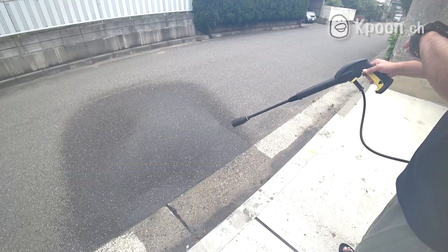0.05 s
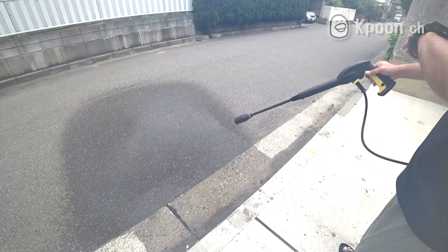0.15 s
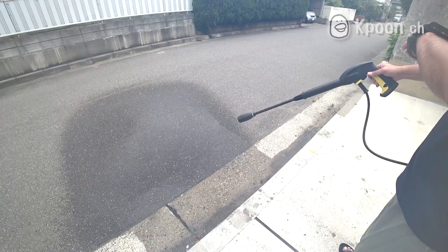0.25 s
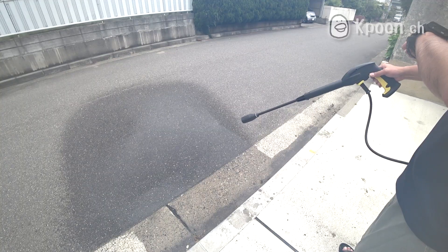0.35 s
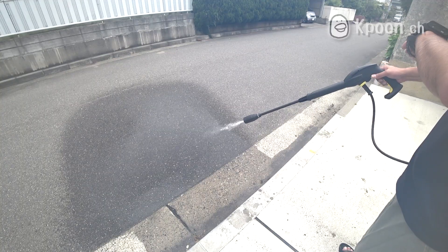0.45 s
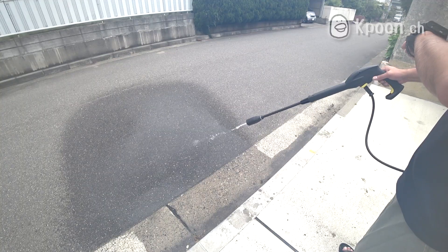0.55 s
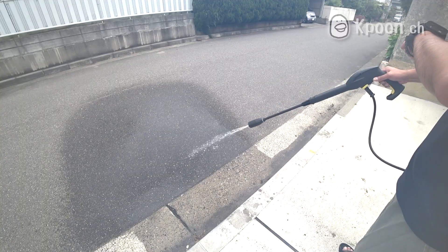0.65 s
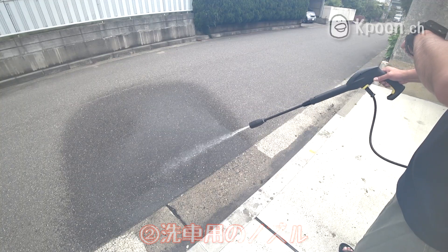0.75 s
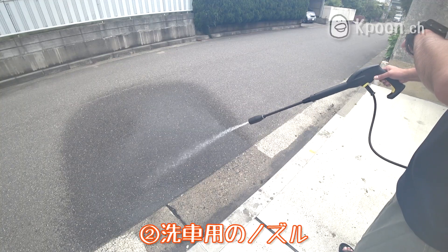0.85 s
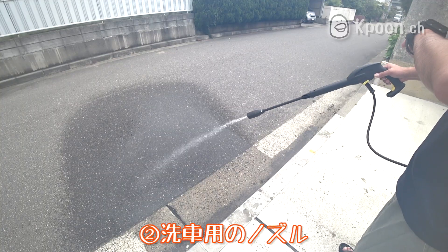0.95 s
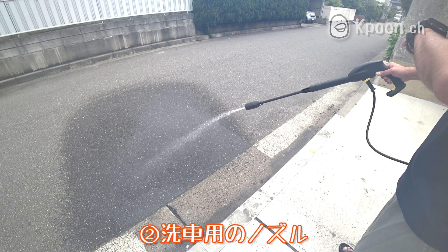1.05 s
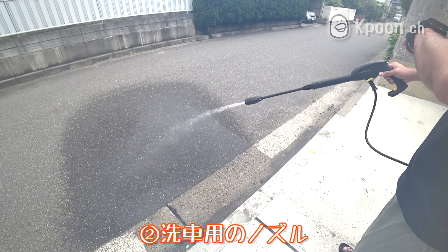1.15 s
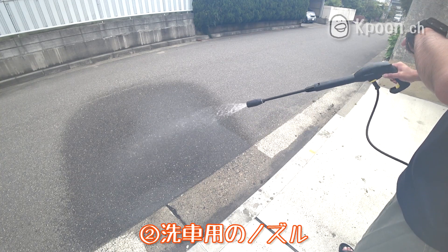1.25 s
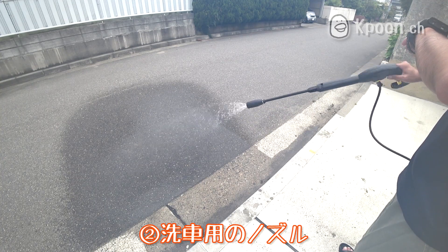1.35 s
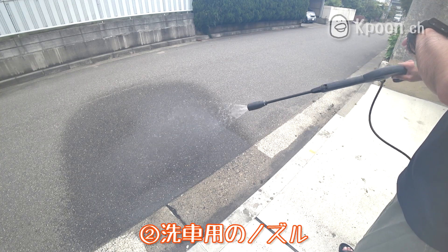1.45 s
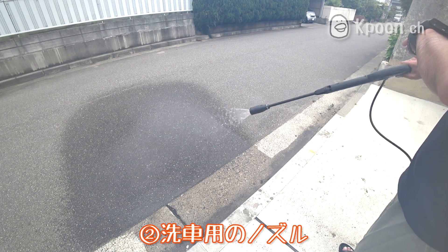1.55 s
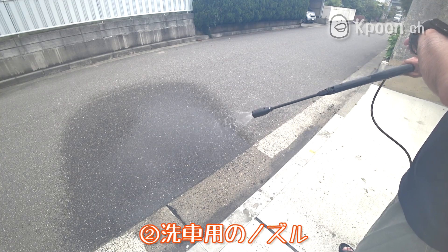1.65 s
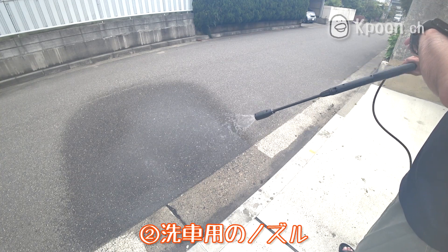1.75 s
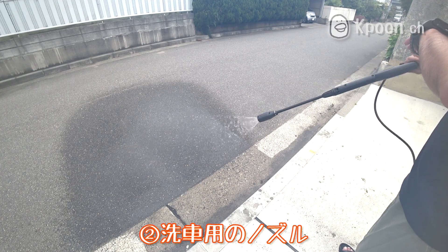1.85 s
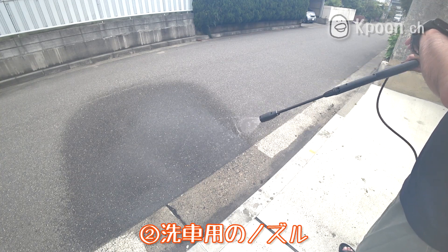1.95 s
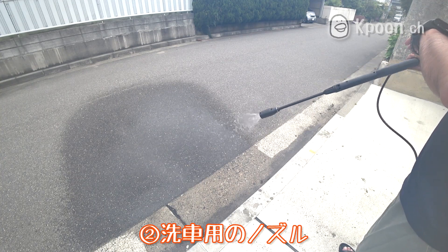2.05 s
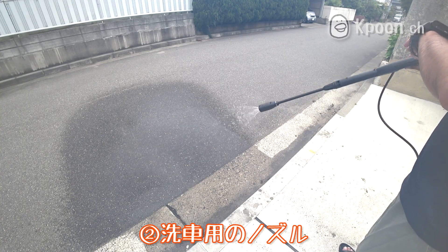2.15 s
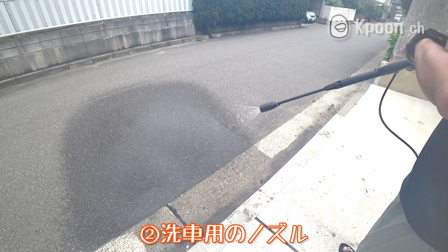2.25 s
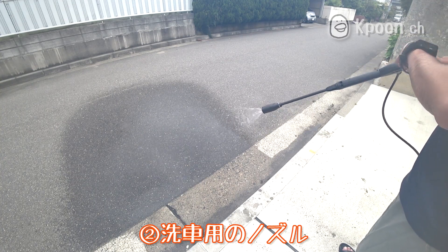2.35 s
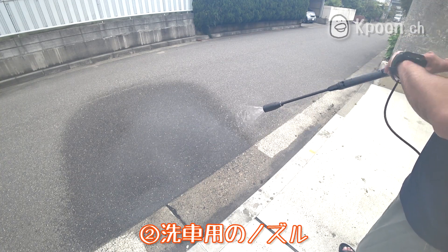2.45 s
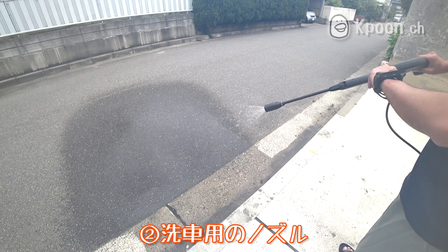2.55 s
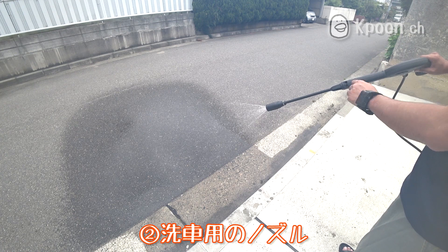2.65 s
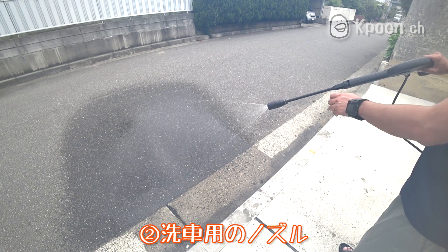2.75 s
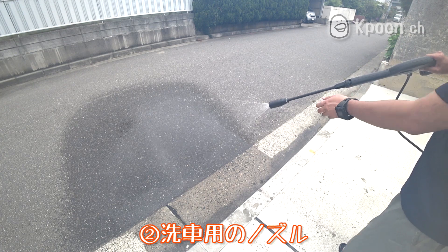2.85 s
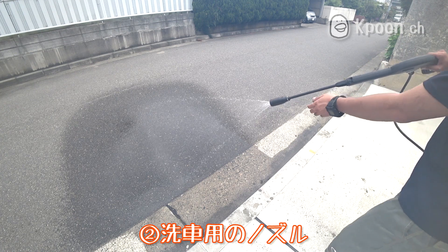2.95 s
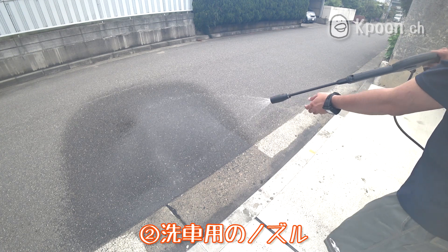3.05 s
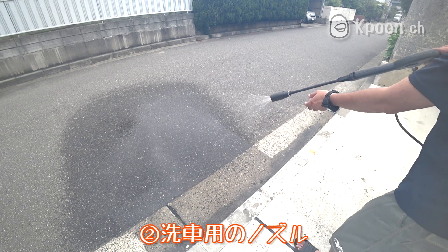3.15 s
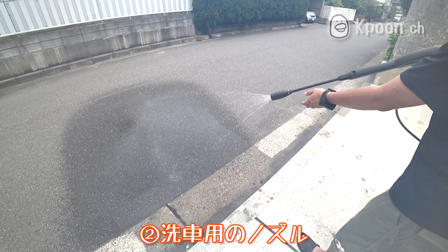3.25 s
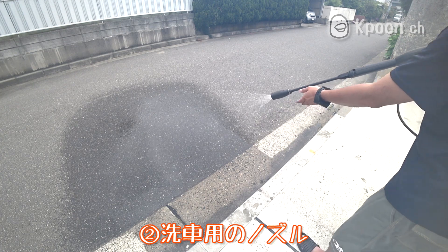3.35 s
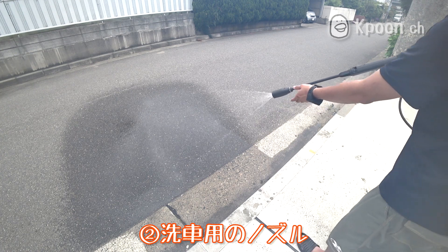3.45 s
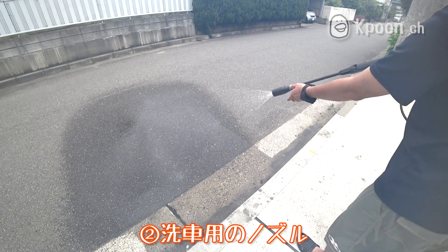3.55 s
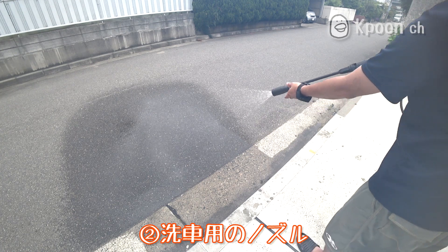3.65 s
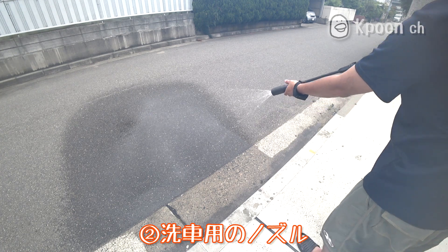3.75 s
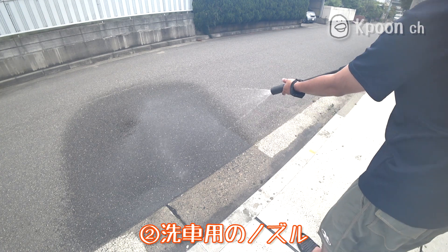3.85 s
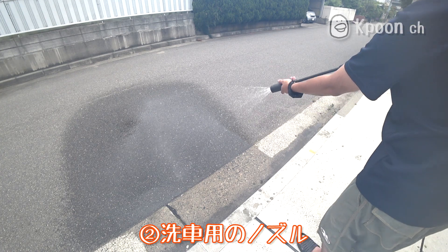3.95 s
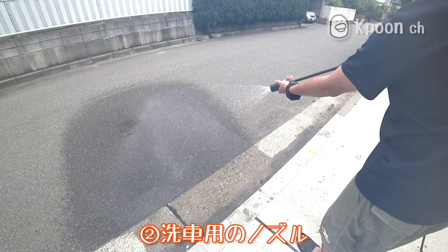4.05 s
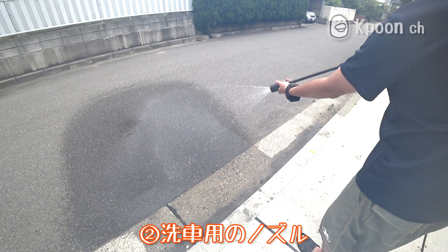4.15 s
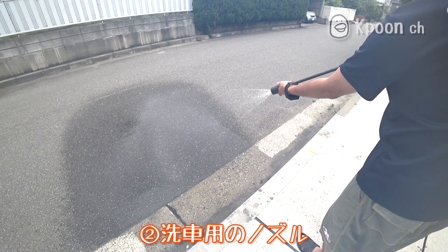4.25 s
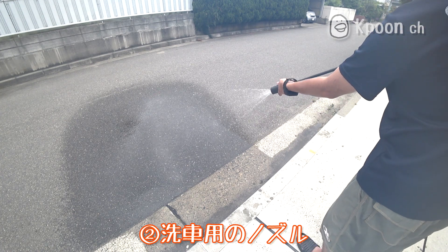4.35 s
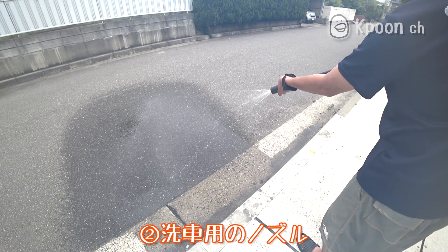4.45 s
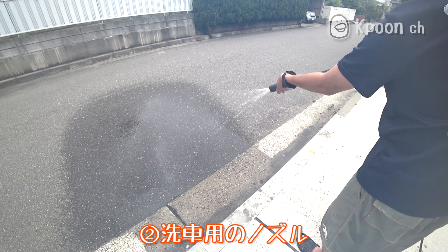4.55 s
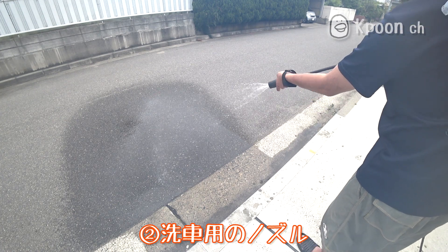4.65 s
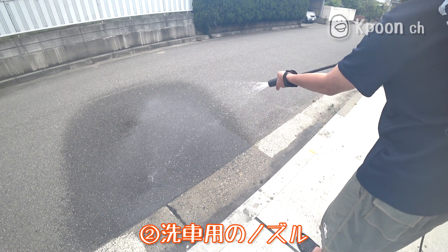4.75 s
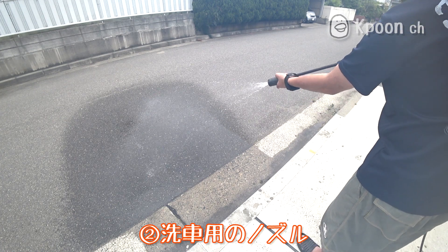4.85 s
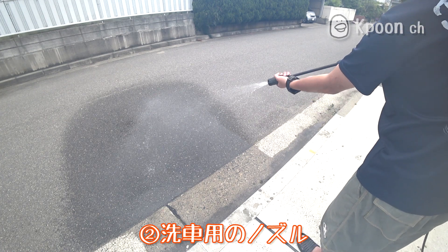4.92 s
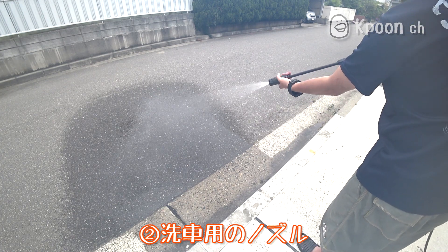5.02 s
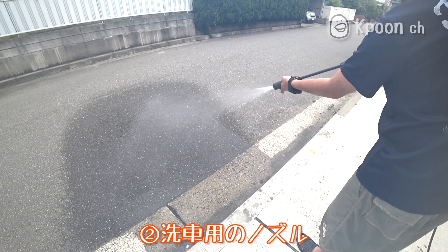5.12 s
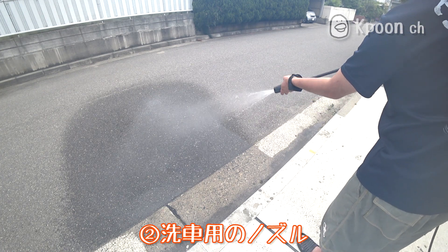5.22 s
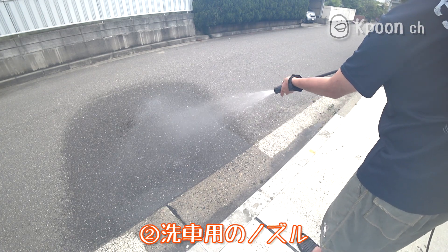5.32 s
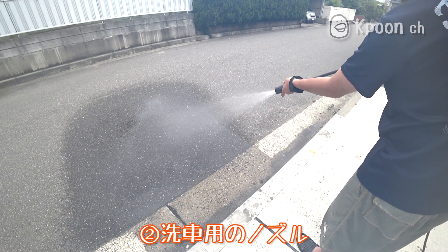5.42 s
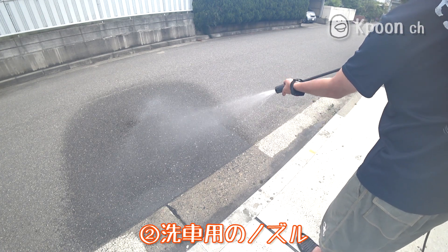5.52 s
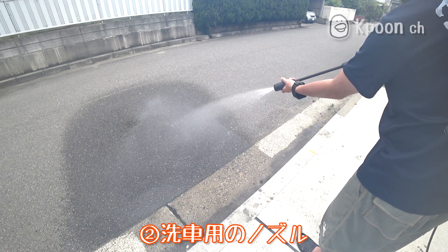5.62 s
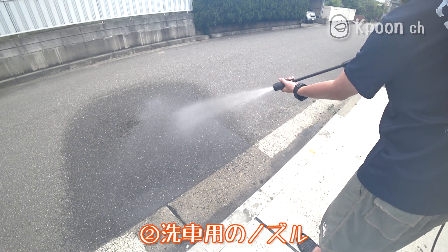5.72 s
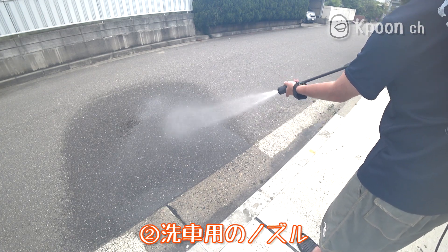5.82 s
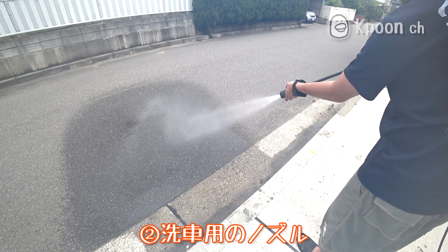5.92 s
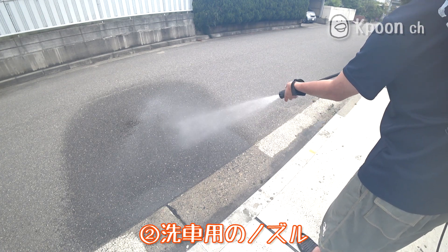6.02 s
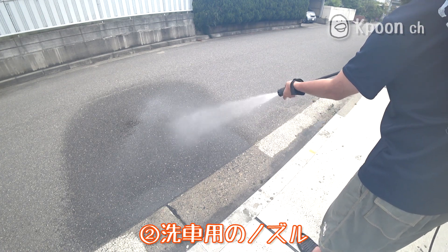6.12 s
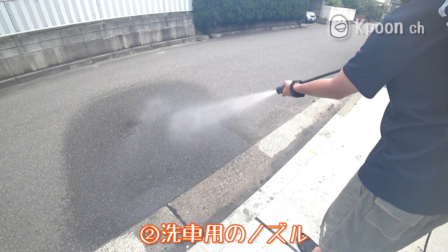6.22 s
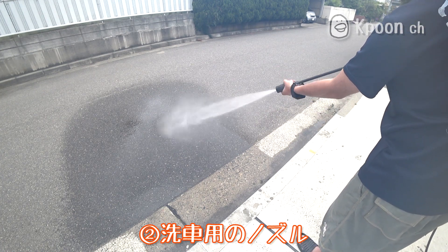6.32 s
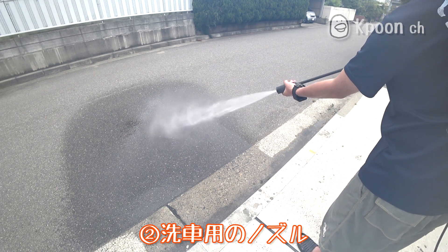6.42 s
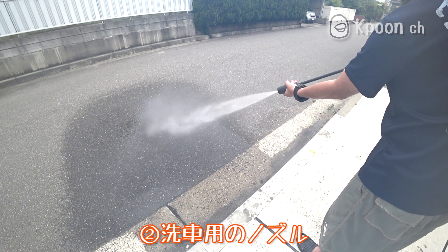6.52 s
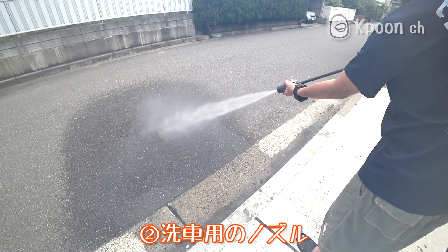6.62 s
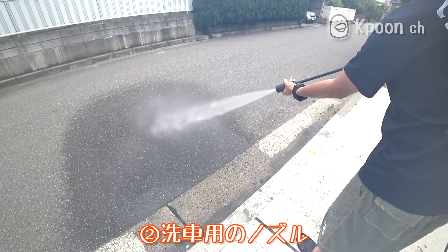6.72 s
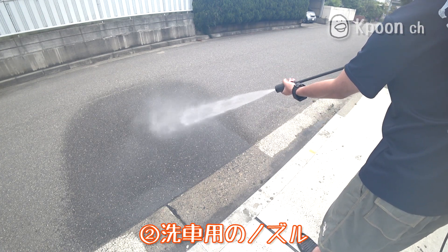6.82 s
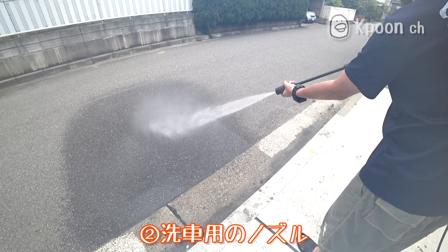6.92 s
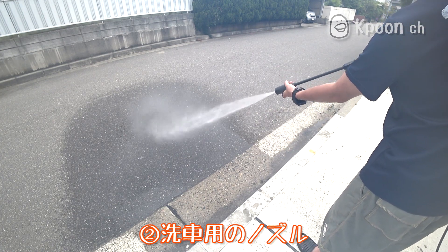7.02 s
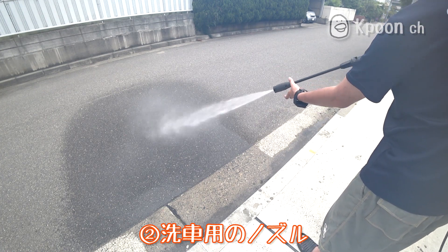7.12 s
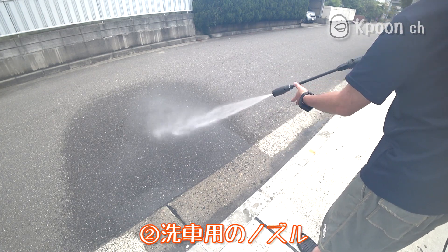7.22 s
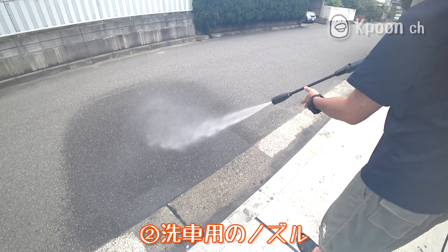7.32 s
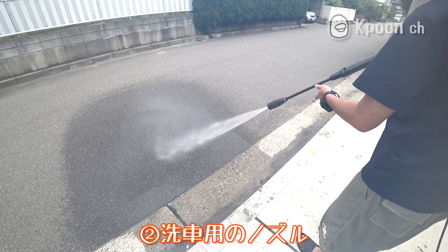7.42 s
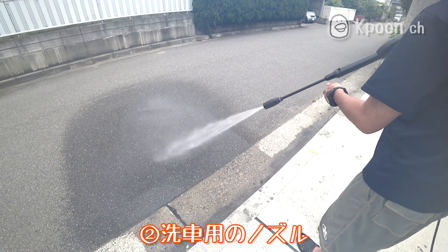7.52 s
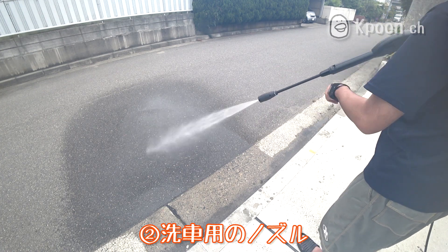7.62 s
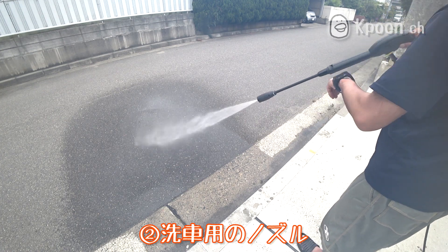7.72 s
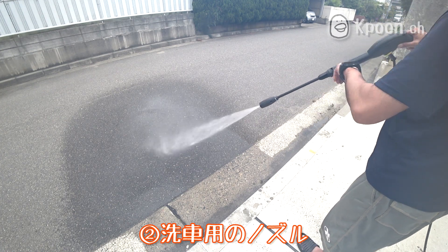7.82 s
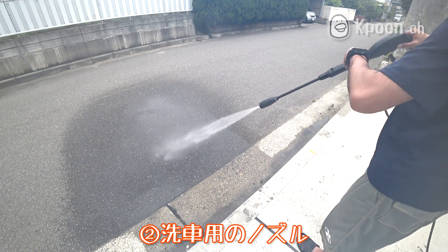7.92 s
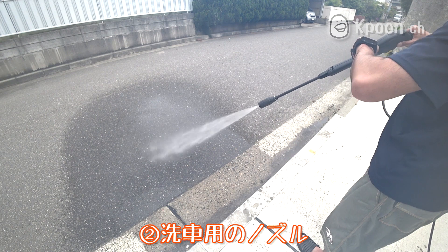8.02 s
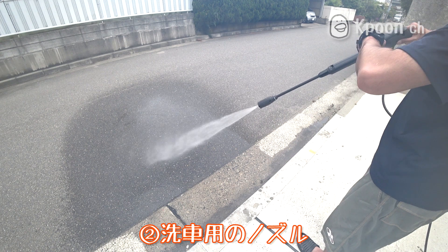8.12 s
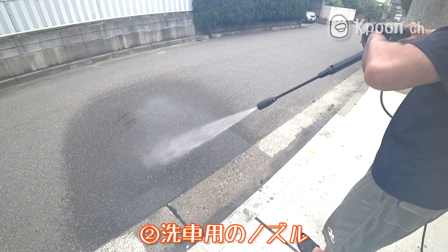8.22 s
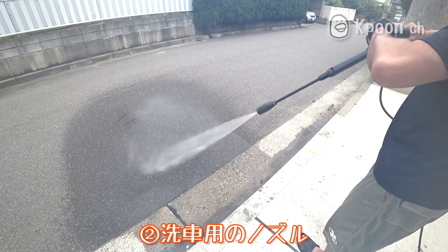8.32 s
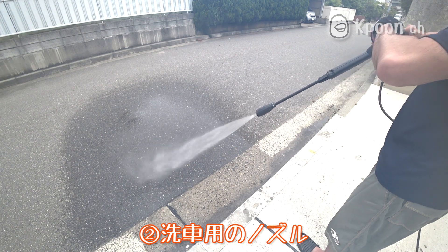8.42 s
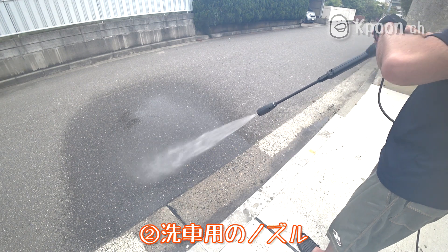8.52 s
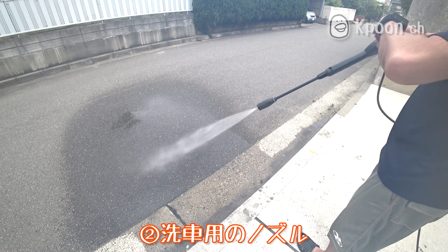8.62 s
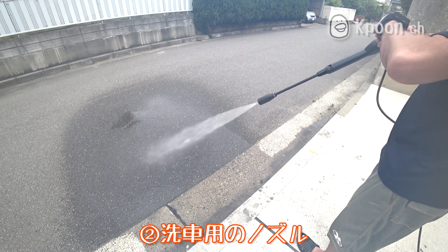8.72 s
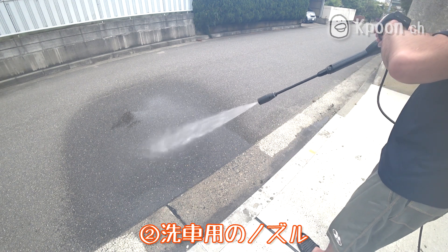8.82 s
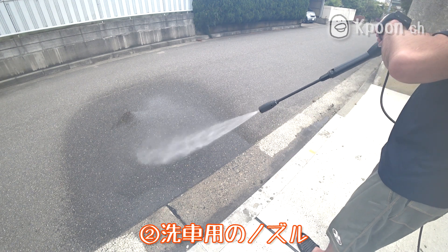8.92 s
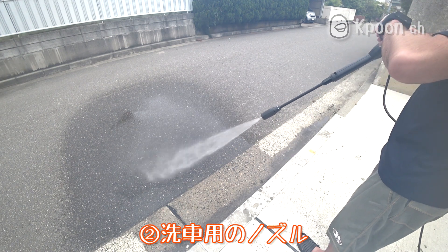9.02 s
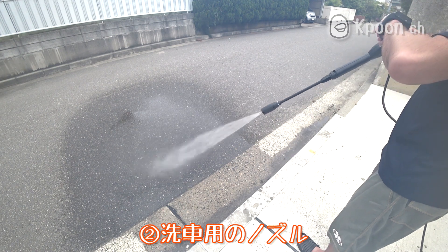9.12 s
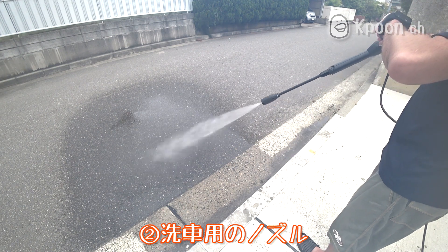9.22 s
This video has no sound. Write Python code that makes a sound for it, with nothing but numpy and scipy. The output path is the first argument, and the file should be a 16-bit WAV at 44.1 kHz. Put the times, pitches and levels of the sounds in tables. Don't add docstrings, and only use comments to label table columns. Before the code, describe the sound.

A bright spray tail cuts off at about 0.1 s, leaving a soft, steady rush of distant traffic and air. At 0.5 s a plastic trigger snaps with a tiny rattle. From about 0.65 s an electric pressure washer spins up, its thin whine rising quickly and swelling until about 1.3 s, then holding near 2.4 kHz over a buzzing, knocking pump. Water roars softly in a wide fan, with a faint fuzzy tube tone. From 5 s the nozzle tightens: the hiss grows brighter and fizzy, a faint breathy whistle appears around 7 kHz, and the motor strains. Around 6.3 s its pitch sinks distinctly and the whine fades, leaving rougher, uneven knocking. Splashy surges hit between 6.4 and 7.7 s, strongest near 7.2 s. From about 8 s the tight jet hisses steadily to the end. Close outdoor camera sound, wide stereo, thin bass, treble cut off above 11 kHz.

```python
import sys
import numpy as np
from scipy import signal
from scipy.fft import rfft, irfft, next_fast_len
from scipy.io import wavfile
from scipy.ndimage import uniform_filter1d, map_coordinates

SR = 44100
rng = np.random.default_rng(int(sys.argv[2]) if len(sys.argv) > 2 else 0)


def generate_wav(sig):
    pcm = np.round(np.clip(np.atleast_2d(sig).T, -1, 1) * 32767).astype(np.int16)
    wavfile.write(sys.argv[1], SR, pcm)


def gain_from_decibels(decibels):
    exponent = np.asarray(decibels, float) / 20
    return 10 ** exponent


N = 408795

# time in seconds, turn (0 wide fan to 8 tight jet).
NOZZLE_TURNS = [(0, 0.5), (2.5, 0), (3.1, 1), (4.92, 1), (5.2, 2), (5.36, 3), (5.6, 3.5), (5.7, 4),
                (5.97, 5), (6.33, 6), (6.39, 7), (6.47, 7), (6.62, 7), (6.78, 7.5), (7.05, 8), (7.4, 8),
                (9.3, 8)]


def unit(x):
    return x / np.sqrt(np.mean(x ** 2) + 1e-20)


def along(points, hz, axis=1):
    columns = np.transpose(points)
    return np.interp(np.log(hz + 1), np.log(columns[0] + 1), columns[axis])


def nozzle_turn():
    s, turn = np.transpose(NOZZLE_TURNS)
    return np.interp(np.arange(N) / SR, s, turn)


def wobble(rate_hz):
    knots = rng.standard_normal(int(N * rate_hz / SR) + 4)
    return map_coordinates(knots, [np.arange(N) * rate_hz / SR])


def bumps(events, axis):
    t = np.arange(N) / SR
    return sum(row[axis] * np.exp(-.5 * abs((t - row[0]) / row[1]) ** 2.3) for row in events)


def filtered(x, response):
    m = next_fast_len(N + 8192)
    return irfft(rfft(x, m) * response(np.fft.rfftfreq(m, 1 / SR)), m)[..., :N]


def placed(x, side_db, turn_rad):
    mid = filtered(x, lambda hz: np.exp(1j * turn_rad) + 0 * hz)
    side = gain_from_decibels(side_db) * x
    return np.array([mid + side, mid - side])


def rush(spectra, side_db, patchy_db, drops_db=-40):
    # frequency in Hz, share in phase, share in quadrature.
    link = [(200, 0.031, 0), (610, -0.29, 0.28), (1220, 0.24, 0.53), (2360, 0.042, 0.67),
            (3100, 0.28, 0.61), (3920, 0.21, 0.81), (4550, 0.052, 0.41), (5800, 0.21, 0.68),
            (7000, 0.3, 0.35), (7900, -0.28, 0.47), (8400, -0.33, 0), (9540, -0.27, 0.055),
            (10140, 0.41, 0.2), (11000, -0.29, 0.6)]
    tick_gain = gain_from_decibels(drops_db + np.minimum(4 * rng.exponential(size=N), 12))
    ticks = tick_gain * (rng.random(N) < .02) * rng.standard_normal(N)
    noise = rng.standard_normal((2, N)) + ticks * [[1], [0]]
    z = signal.stft(noise, nperseg=512)[2]
    patches = uniform_filter1d(rng.standard_normal(z.shape[1:]), 8, 0)
    patches = unit(uniform_filter1d(patches, 10, 1))
    tied, loose = signal.istft(z * gain_from_decibels(patchy_db * patches), nperseg=512)[1][:, :N]

    def tie(hz):
        return along(link, hz) + 1j * along(link, hz, axis=2)

    free = filtered(loose, lambda hz: np.sqrt(np.clip(1 - abs(tie(hz)) ** 2, 0, 1)))
    mid = filtered(tied, tie) + free
    mid = unit(filtered(mid, lambda hz: gain_from_decibels(along(spectra[0], hz))))
    side = gain_from_decibels(side_db) * unit(filtered(tied, lambda hz: gain_from_decibels(along(spectra[1], hz))))
    return np.array([mid + side, mid - side])


def street():
    # frequency in Hz, density in dB per Hz.
    street_spectra = [
        [(18, -79), (30, -42), (75, -26), (173, -16.5), (206, -14.5), (642, -9), (1000, -1.5), (1770, -5), (2690, -16.5), (11000, -23), (14300, -60), (22000, -120)],
        [(18, -93), (30, -55), (227, -17.5), (306, -13.5), (392, -11.5), (554, -6.5), (611, -8), (1520, 1.5), (2100, -14), (11000, -32.5), (14300, -66), (22000, -120)],
    ]
    return gain_from_decibels(-41.5) * rush(street_spectra, side_db=8.0, patchy_db=0.5)


def trigger():
    # time in seconds, level in dB.
    impacts = [
        (0.4942, -13),
        (.4955, -3),
        (0.4992, -13),
        (0.5085, -17),
        (.5158, -13),
        (.5215, -18),
    ]
    # frequency in Hz, level in dB, t60 in seconds.
    shell_modes = [(1560, -3, 0.016), (1710, 5, 0.016), (1950, 0.5, 0.016), (2090, 1, .018),
                   (3080, 2, 0.009), (3830, -14, 0.022), (4370, -9, 0.011), (7660, -6, 0.01),
                   (10350, -10, 0.012)]
    x, t = np.zeros(N), np.arange(SR // 20) / SR
    for start_s, hit_db in impacts:
        ring = 0
        for hz, mode_db, t60_s in shell_modes:
            start_db = mode_db + rng.normal(0, 1) + .15 * hit_db * np.log2(hz / 2000)
            ring = ring + gain_from_decibels(start_db - 60 * t / t60_s) * np.sin(2 * np.pi * hz * t)
        crack = 0.2 * gain_from_decibels(-60 * t / 0.03) * rng.standard_normal(len(t))
        onset = 1 - np.exp(-t / .001)
        x[round(start_s * SR):][:len(t)] += gain_from_decibels(hit_db - 14) * (ring + crack) * onset
    thin = filtered(x, lambda hz: (1j * hz / (1000 + 1j * hz)) ** 3 / (1 + 1j * hz / 5000))
    return placed(thin, side_db=4, turn_rad=1.6)


def whistle():
    # nozzle turn, frequency in Hz, level in dB.
    edge_tone = [(1, 7330, -70), (2.5, 7300, -57), (3.6, 7260, -58), (4, 7300, -53), (5.1, 7340, -54),
                 (5.5, 6950, -55), (6, 6850, -64), (7, 6850, -80)]
    at_turn, tone_hz, tone_db = np.transpose(edge_tone)
    turn = nozzle_turn()
    pitch_hz = np.interp(turn, at_turn, tone_hz) + 60 * wobble(14)
    tone = unit(wobble(300) * np.sin(2 * np.pi * np.cumsum(pitch_hz) / SR))
    gain = gain_from_decibels(np.interp(turn, at_turn, tone_db) + 2.5 * wobble(12))
    return gain * tone * gain_from_decibels([[1], [-1]])


def lance(lance_db):
    def mode(f, hz, width_hz):
        return 1j * f * width_hz / (hz * hz - f * f + 1j * f * width_hz)

    def tube(f):
        return mode(f, 1615, 25) + mode(f, 1668, 30) + gain_from_decibels(-14) * mode(f, 7320, 90)

    tone = unit(filtered(rng.standard_normal(N), tube))
    return placed(gain_from_decibels(lance_db) * tone, side_db=-3, turn_rad=0.97)


def motor():
    # multiple of stroke rate, then level in dB at each of the knock speeds.
    piston_orders = [(8, -19, -28, -28, -28), (9, -18, -9, -20, -17), (10, -13, -19, -26, -23),
                     (11, -5, -11, -24, -24), (12, 0, -2, -16, -15), (13, -10, -8, -18, -14),
                     (14, -24, -11, -9, -15), (15, -9, -14, -3, -13), (16, -24, -22, -13, -9),
                     (17, -15, -16, -20, -13), (18, -10, -15, -22, -24), (23, -24, -22, -12, -9)]
    knock_speeds_hz = [2400, 2320, 1970, 1940]
    # multiple of mesh, level in dB.
    mesh_lines = [(1, 0), (2, -50), (3, -22)]
    # multiple of mesh, level in dB.
    brush_lines = [(2.879, -37), (3.429, -39), (4.034, -36), (4.059, -39)]
    sag_hz = [0, 0, 0, 33, 58, 122, 138, 460, 519]
    drive_below_hz = [0, 3, 7, 30, 60, 100, 130, 190, 300, 460, 472, 488, 519]
    # whine in dB, piston in dB, boost of the 13th order in dB.
    drive = [(-43.5, -44, -2), (-44, -41, 0), (-43, -42, 9), (-43, -45, 10.5), (-39.5, -46, 9),
             (-45, -41, -1), (-42.5, -40, -8), (-50, -51, -3), (-60, -53, -2), (-60, -49, -2),
             (-62, -45, 0), (-60, -37, 0), (-62, -43, 1)]
    # centre in seconds, half length in seconds, gain in dB.
    flares = [
        (.81, .055, 8),
        (1.02, 0.036, 9.5),
        (1.29, 0.091, 9),
        (6.33, 0.037, 4),
    ]
    # change of whine, piston and boost in dB.
    empty_db = [-8, -6.5, 8]
    free_hz, lag_start_hz, empty_hz = 2453, 330, 60
    start_s, spin_s, spin_shape = .66, .18, .8
    mesh_per_stroke = 37.7

    t, turn = np.arange(N) / SR, nozzle_turn()
    lag_hz = lag_start_hz * np.exp(-(np.maximum(t - start_s, 0) / spin_s) ** spin_shape)
    below_hz = lag_hz + np.interp(turn, np.arange(len(sag_hz)), sag_hz)
    mesh_hz = free_hz - below_hz
    emptiness = np.tanh(lag_hz / empty_hz)
    whine_db, piston_db, boost_db = (np.interp(below_hz, drive_below_hz, column) + db * emptiness
                                     for column, db in zip(np.transpose(drive), empty_db))
    whine_db += bumps(flares, axis=2)
    on = np.clip((t - .62) / .1, 0, 1)

    mesh_rad = 2 * np.pi * np.cumsum(mesh_hz * (1 + 0.00062 * wobble(12))) / SR
    stroke_rad = mesh_rad / mesh_per_stroke
    whine = 0
    for k, line_db in mesh_lines + brush_lines:
        breath_db = 1.3 * wobble(22.05) + 0.75 * np.cos(stroke_rad)
        whine = whine + gain_from_decibels(line_db + breath_db) * np.sin(k * mesh_rad)

    unsteady_db = 1.4 + 2.1 * below_hz / sag_hz[-1]
    knock = 0
    for k, *speed_db in piston_orders:
        order_db = np.interp(-mesh_hz, -np.array(knock_speeds_hz), speed_db)
        order_db += boost_db * ((k == 13) - 0.31 * (k == 12))
        phase_rad = k * stroke_rad + 1.3 * k * k + 0.56 * wobble(6)
        knock = knock + gain_from_decibels(order_db + unsteady_db * wobble(5)) * np.sin(phase_rad)
    gears = placed(gain_from_decibels(whine_db + 3) * whine, side_db=8.5, turn_rad=1.1)
    pistons = placed(gain_from_decibels(piston_db) * knock, side_db=10, turn_rad=2.2)
    return on * (gears + pistons)


def water_db():
    # roar, jet, mist, splash, lance in dB.
    water_levels = [(-39.5, -57, -56.5, -57, -49.5), (-39, -54.5, -54, -48, -50.5),
                    (-38.5, -51.5, -43.5, -45, -50), (-39, -52, -42.5, -44, -54),
                    (-39.5, -49.5, -38.5, -39, -52), (-39.5, -49, -35, -40, -53),
                    (-38, -47.5, -36, -37, -59), (-37, -40, -42.5, -39.5, -59), (-40.5, -39, -42, -42, -57)]
    # centre in seconds, half length in seconds, mist in dB, splash in dB.
    surges = [
        (6.02, .05, 2.5, -1.5),
        (6.14, .05, 1.5, -1),
        (6.42, 0.052, -3, 7),
        (6.585, 0.08, 6, 8),
        (6.92, 0.044, 6.5, 8.5),
        (7.18, 0.058, 13, 8.5),
        (7.56, .05, 0, 5.5),
        (7.665, 0.064, 4, 8),
    ]
    fill_db = [-11, -9, -6, -10, -30]
    burst_db = [-40.5, -44, -46, -53, -90]
    lift_db = [0, -.5, 3, -2.5, 1]
    fill_s, fill_tau_s, burst_end_s, lift_s, jet_share = 0.58, 0.19, .083, 7.9, 0.14

    t, turn = np.arange(N) / SR, nozzle_turn()
    set_db = np.array([np.interp(turn, np.arange(len(water_levels)), layer)
                       for layer in np.transpose(water_levels)])
    fill = np.exp(-(t - fill_s) / fill_tau_s)
    lift = np.clip((t - lift_s) / .2 + .5, 0, 1)
    mist_db, splash_db = bumps(surges, axis=2), bumps(surges, axis=3)
    layers_db = set_db + np.outer(fill_db, fill) + np.outer(lift_db, lift)
    layers_db[1:4] += [jet_share * splash_db, mist_db, splash_db]
    return np.where(t < burst_end_s, np.array(burst_db)[:, None], layers_db)


def spray(roar_db, jet_db, mist_db, splash_db):
    # frequency in Hz, density in dB per Hz.
    roar_spectra = [
        [(120, -49), (200, -21.5), (521, -8), (590, -13), (771, 0), (902, -10), (1360, -3), (1660, -4), (2040, -7.5), (2420, 0), (2790, -11.5), (4000, -15.5), (5150, -19.5), (7150, -28.5), (8500, -23), (11000, -58), (18700, -120)],
        [(120, -59), (200, -36), (590, -11.5), (771, 0.5), (916, -8), (1330, -2), (2100, -20), (2310, -5), (2420, -7), (2540, -17), (2790, -19), (3640, -21), (5930, -36.5), (7270, -31), (8500, -40), (11000, -67), (18700, -120)],
    ]
    jet_spectra = [
        [(1120, -55), (1900, -11.5), (2230, 5), (2610, -9), (2740, -11), (3090, -7.5), (4390, -5.5), (4830, -14.5), (5600, -3), (6200, -9), (7180, 2), (8200, -7), (8820, -5), (9570, -4.5), (11000, -1.5), (14300, -40), (22000, -120)],
        [(1120, -39), (1900, -12), (2030, -8), (2270, 5), (2510, -6), (2760, -14), (3060, -8), (3350, -5), (3650, -10), (5200, -15), (7240, -10.5), (9020, -18), (11000, -13.5), (14300, -44), (22000, -120)],
    ]
    mist_spectra = [
        [(5000, -50), (8500, -20), (8780, -20), (9300, -1), (10000, 7), (10500, 4), (11100, 6), (14400, -44), (22000, -120)],
        [(5000, -41), (8500, -11), (9070, -10), (9770, -7), (10600, 0), (11100, 0), (14400, -32), (22000, -120)],
    ]
    splash_spectra = [
        [(1590, -35), (2700, -8.5), (2800, -9.5), (3060, -1), (3520, -0.5), (3740, 2), (3840, -3), (4120, -3), (4500, -5), (5850, -39), (9900, -120)],
        [(1590, -39), (2700, -9), (2790, -10), (3060, -4), (3370, -4), (3630, 0), (4150, -4), (4280, -7), (4360, -13), (4500, -10), (5850, -42), (9900, -120)],
    ]
    flicker_db = 0.29 * wobble(8.2) + 0.3 * wobble(30)
    roar_gain = gain_from_decibels(roar_db + 0.53 * flicker_db)
    jet_gain = gain_from_decibels(jet_db + 4 + flicker_db)
    mist_gain = gain_from_decibels(mist_db - 1 + flicker_db + 0.4 * wobble(25))
    splash_gain = gain_from_decibels(splash_db - 2.5 + flicker_db + 0.36 * wobble(15))
    roar = roar_gain * rush(roar_spectra, side_db=9.5, patchy_db=0.5)
    jet = jet_gain * rush(jet_spectra, side_db=-0.5, patchy_db=0.06, drops_db=-2.0)
    mist = mist_gain * rush(mist_spectra, side_db=-5.5, patchy_db=2.0, drops_db=0.5)
    splash = splash_gain * rush(splash_spectra, side_db=2.5, patchy_db=0.4, drops_db=-4.0)
    return roar + jet + mist + splash


def scene():
    *spray_db, lance_db = water_db()
    return street() + trigger() + whistle() + lance(lance_db) + motor() + spray(*spray_db)


def roll_off(x):
    return signal.sosfilt(signal.butter(12, 12070, fs=SR, output="sos"), x)


def record(dry):
    # frequency in Hz, half width in Hz, sum in dB, difference in dB.
    cavities = [(1485, 30, 2.5, 1), (1530, 40, 0, -6), (1658, 38, 5, 0.5), (1894, 38, 2, 6.5),
                (2545, 36, 3, 10), (2580, 45, 0.5, -1), (3124, 40, 5.5, 2.5), (3236, 35, -7, -2),
                (3390, 37, 4, -2), (3693, 24, 4, 4.5), (4076, 31, 6.5, 4), (4080, 36, -1.5, -4),
                (4650, 80, 0.5, 2), (5560, 65, 2.5, -7), (7670, 120, -0.5, -2), (9000, 100, -2.5, 0),
                (9400, 110, 3.5, 5), (10330, 120, 3, 0), (10540, 70, -5.5, 2)]
    top_hz = 11040

    def band(hz):
        return hz ** 2 / (hz ** 2 + 25 ** 2) * np.clip((top_hz - hz) / 60, 0, 1)

    def colour(hz, axis):
        return gain_from_decibels(sum(row[axis] / (1 + ((hz - row[0]) / row[1]) ** 2) for row in cavities))

    mid = filtered(dry[0] + dry[1], lambda hz: band(hz) * colour(hz, axis=2)) / 2
    side = filtered(dry[0] - dry[1], lambda hz: band(hz) * colour(hz, axis=3)) / 2
    return roll_off(np.array([mid + side, mid - side]))


dry = scene()
out = record(dry)
generate_wav(out)
```